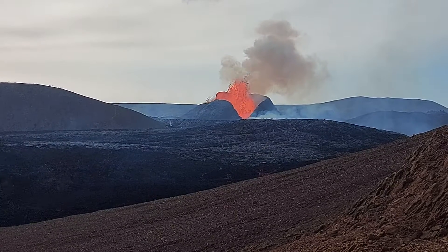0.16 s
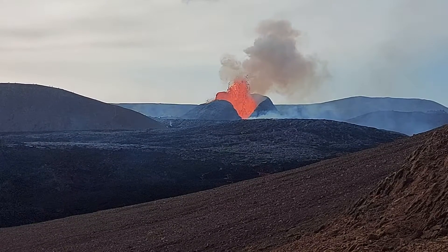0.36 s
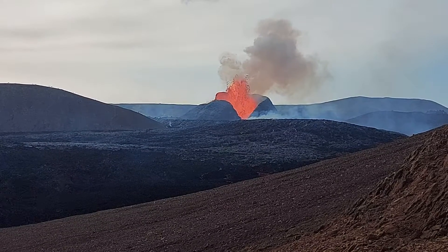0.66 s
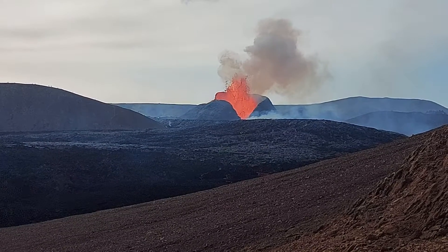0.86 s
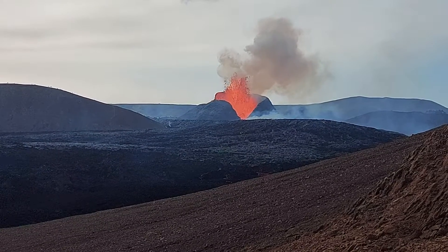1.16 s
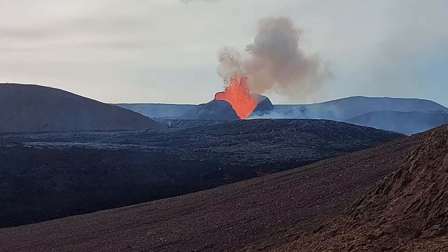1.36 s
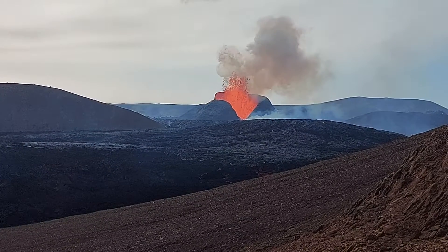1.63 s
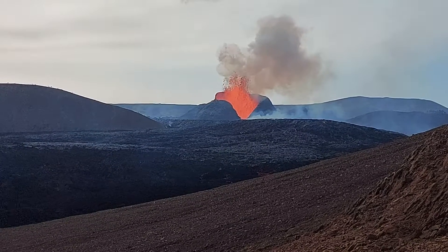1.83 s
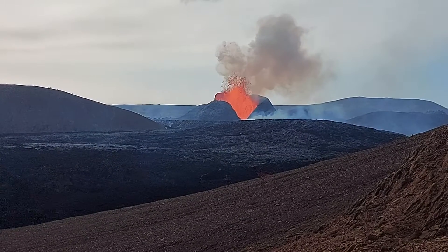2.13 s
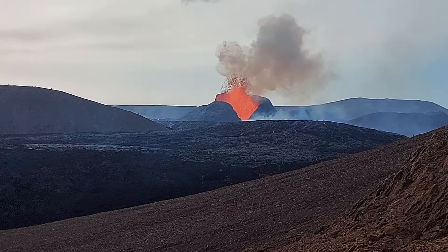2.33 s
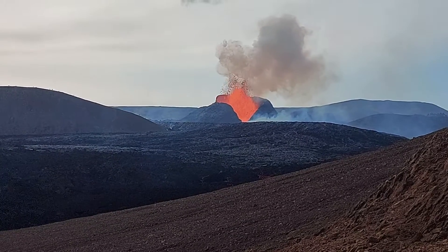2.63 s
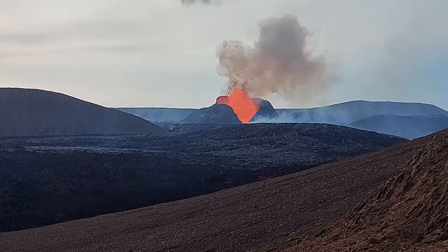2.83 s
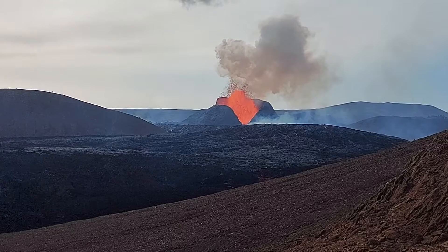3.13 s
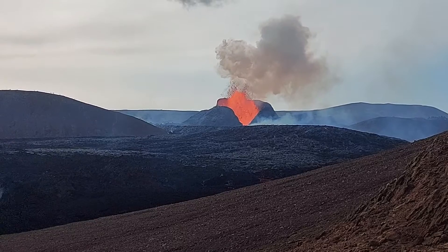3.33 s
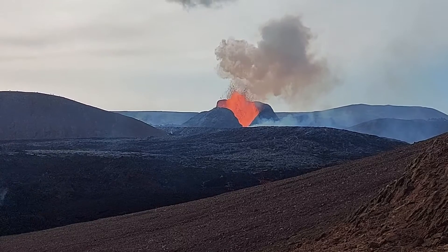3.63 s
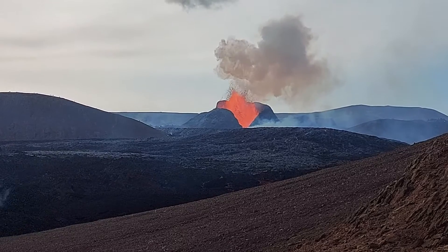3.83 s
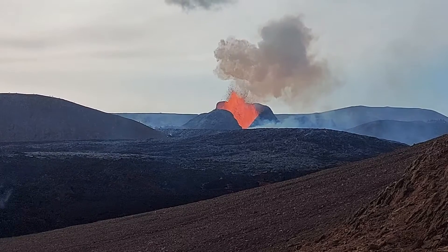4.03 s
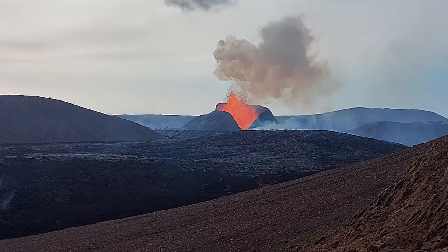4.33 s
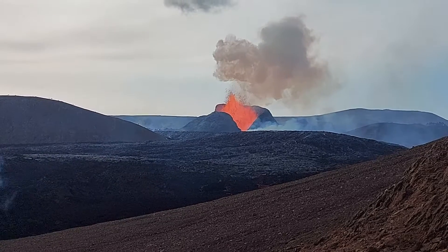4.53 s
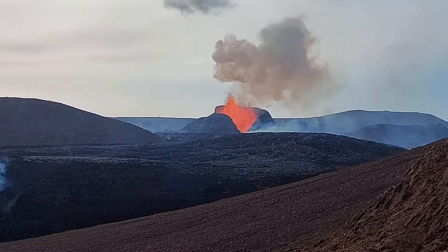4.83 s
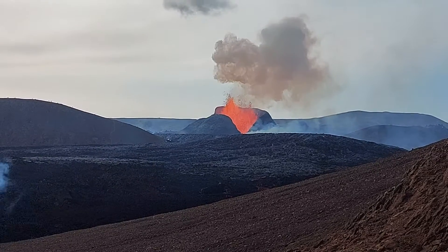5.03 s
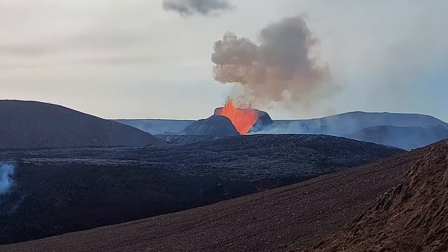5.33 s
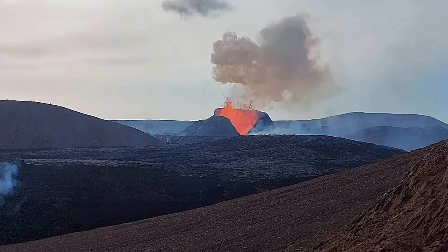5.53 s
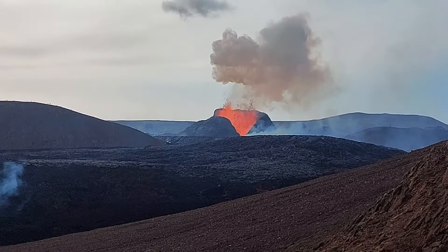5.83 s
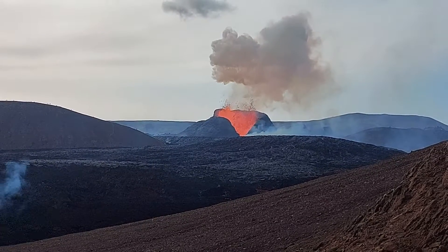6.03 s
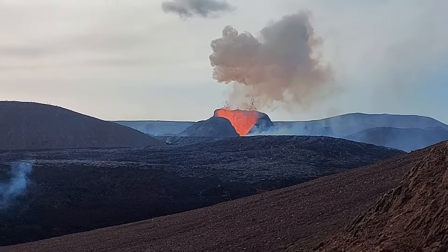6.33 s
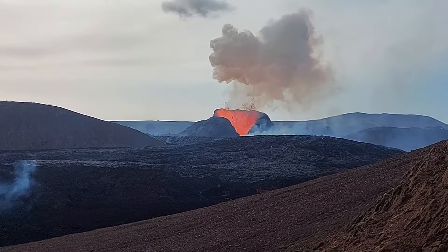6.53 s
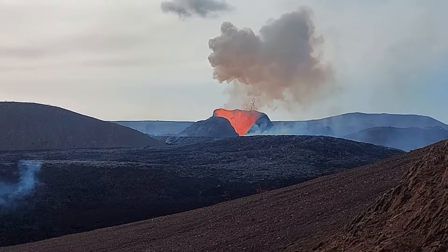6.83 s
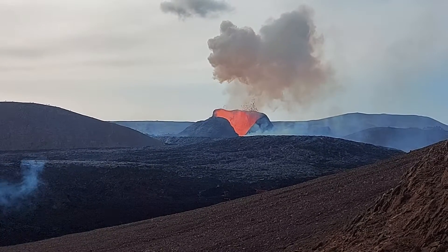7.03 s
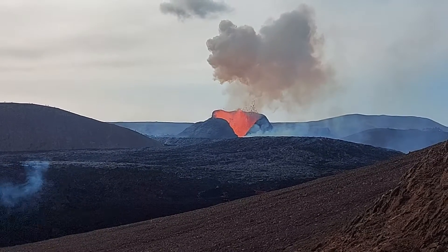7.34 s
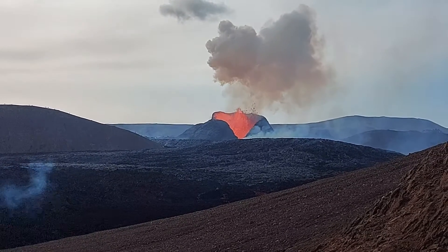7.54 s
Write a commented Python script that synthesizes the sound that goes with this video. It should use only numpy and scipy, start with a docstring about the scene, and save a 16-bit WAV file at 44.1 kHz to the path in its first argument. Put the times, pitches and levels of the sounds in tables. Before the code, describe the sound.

A distant lava fountain rumbles and rushes steadily, mostly bass and low mids, with a deep hollow resonance from the crater and irregular soft thumps. Wind presses on the microphone unevenly, strongest at first, making the left bass cut away. Faint close grit crunches just after four seconds, a sharp tick and small stone rattle come near six, then fine rustles near the end. Open terrain, faint hiss.

```python
"""On an open lava field, heard from a gravel slope, a lava fountain roars in a far spatter cone.
Turbulent gas and bursting slugs, as shaped noise and damped pulses, make the roar; the crater resonates deeply.
Wind eddies buffet and flutter at two microphone ports, and the bass drops away at times on the left.
Impulses and resonated grains give faint ticks, rustles, crunches and a small stone close by, over a thin hiss."""
import sys
import numpy as np
from scipy import signal
from scipy.fft import rfft, irfft
from scipy.io import wavfile
from scipy.ndimage import uniform_filter1d

SR = 44100
rng = np.random.default_rng(int(sys.argv[2]) if len(sys.argv) > 2 else 0)


def to_wav(sig):
    """Store sig (one row per channel, or 1-D mono) as 16-bit WAV at the path in sys.argv[1].

    Samples outside -1..1 are clipped; the rate is SR.
    """
    pcm = np.clip(np.atleast_2d(sig), -1, 1) * 32767
    pcm = np.round(pcm).astype(np.int16)
    wavfile.write(sys.argv[1], SR, pcm.T)  # frames by channels


N = 338688
TIME = np.arange(N) / SR


def undb(db):
    """Logarithmic level: decibels to an amplitude gain."""
    return 10 ** (np.asarray(db) / 20)


def curve(table):
    """Linear interpolation: a table of (seconds, value) read at every sample."""
    seconds, values = np.transpose(table)
    return np.interp(TIME, seconds, values)


def unit(x):
    """Normalisation: scale to an rms of 1."""
    return x / np.sqrt(np.mean(x ** 2))


def steady(x, span_s):
    """Envelope flattening: about rms 1 over every span, so that only quicker flutter stays."""
    size = int(span_s * SR / 2)
    power = uniform_filter1d(uniform_filter1d(x ** 2, size), size)
    return x / np.sqrt(power + 1e-18)


def colour(x, points):
    """Linear filtering: gains at (Hz, dB) points, joined along a logarithmic frequency axis."""
    point_hz, point_db = np.transpose(points)
    hz = np.maximum(np.fft.rfftfreq(N, 1 / SR), 1)
    gain_db = np.interp(np.log(hz), np.log(point_hz), point_db)
    return irfft(rfft(x) * undb(gain_db), N)


def ring(x, hz, width_hz):
    """Resonance: one damped mode, its decay set by its bandwidth."""
    b, a = signal.iirpeak(hz, hz / width_hz, fs=SR)
    return signal.lfilter(b, a, x)


def pan(left_over_right_db):
    """Level difference between the channels: left and right gains with a mean of 1."""
    left = undb(np.atleast_1d(left_over_right_db))
    return 2 * np.array([left, np.ones_like(left)]) / (1 + left)


def bell(peak_s, half_s):
    """Gaussian envelope: a smooth swell towards 1 and back, 1/e at half_s from the peak."""
    return np.exp(-((TIME - peak_s) / half_s) ** 2)


def held(start_s, end_s, edge_s):
    """Trapezoidal envelope: rises to 1 around the start, holds, and falls around the end."""
    return np.clip(np.minimum(TIME - start_s, end_s - TIME) / edge_s + .5, 0, 1)


def billow(per_s):
    """Smoothed random process: wandering with an rms of 1, slower for a smaller per_s."""
    size = int(SR / per_s)
    smooth = uniform_filter1d(rng.standard_normal(N), size, mode="wrap")
    return unit(uniform_filter1d(smooth, size, mode="wrap"))


def bursts(per_s, spread_db):
    """Random point process: pressure pulses, many small and a few large."""
    size = undb(spread_db * np.minimum(rng.exponential(size=N), 4))
    hits = size * (rng.random(N) < per_s / SR)
    return unit(hits - hits.mean())


def turbulence(per_s, spread_db, gas_db):
    """Broadband flow noise: bursting bubbles in a stream of rushing gas."""
    return bursts(per_s, spread_db) + undb(gas_db) * rng.standard_normal(N)


# Short rises and falls of the rumble and roar; the whole bass sinks in the falls. Each row: peak in seconds,
# half length in seconds, rise of the rumble in dB, rise of the roar in dB; a negative rise is a fall.
RISES_AND_FALLS = [(0.002, 0.025, 9.5, 4.5), (0.083, 0.036, -10, 0), (0.217, 0.072, 1, 2),
                   (.49, 0.025, -6.5, 1), (0.562, 0.042, 1, 4.5), (0.656, 0.018, -14, 0),
                   (1.02, 0.078, -1.5, 1), (1.403, 0.013, -6, -3), (1.512, 0.037, -12.5, -1),
                   (1.627, .03, -12, -3), (1.717, 0.017, -12, -3), (1.848, 0.021, -9, 1.5),
                   (2.09, 0.017, -11, 2), (2.18, .036, 0, 2), (2.58, 0.0069, 1, 2), (2.77, 0.032, -6, .5),
                   (3.194, 0.041, 2, 2), (3.285, 0.0097, -9.5, -4), (3.45, 0.027, -5.5, -0.5),
                   (3.79, 0.04, -3.5, -.5), (4.164, .012, -3, -1.5), (4.54, 0.017, -2, 0),
                   (5.194, 0.044, 4, 0), (5.301, 0.01, -11, 1.5), (5.35, 0.058, 0.5, 0),
                   (5.45, 0.014, -3.5, -2), (5.63, 0.01, -5.5, 0), (5.676, 0.0067, -5.5, 0.5),
                   (5.843, 0.056, 0, -1), (6.45, 0.066, -2.5, -.5), (6.613, 0.02, 3.5, 2),
                   (6.668, 0.013, -2.5, -3), (6.954, 0.054, 0.5, -0.5), (7.04, 0.032, -1, -2),
                   (7.24, 0.011, -6, -3), (7.329, 0.017, -10, .5), (7.521, 0.028, 0, -2.5),
                   (7.61, 0.016, 4, 0.5)]


def bass_falls():
    """Amplitude modulation: the falls of the rumble alone, in dB, for the rest of the bass to share."""
    return sum(min(rumble_rise_db, 0) * bell(s, half_s) for s, half_s, rumble_rise_db, _ in RISES_AND_FALLS)


# Strength of the fountain, which drives roar, rumble and crater note. Each row: time in seconds, level in dB.
FOUNTAIN_LEVEL = [(0, -46.5), (.95, -49), (1.3, -45.5), (1.6, -46.5), (1.9, -45), (2.6, -43.5), (3.4, -43),
                  (4.05, -39), (4.95, -43), (5.8, -42), (6.3, -39.5), (6.8, -41), (7.2, -39), (7.68, -40)]
# Long blows that set the crater ringing. Each row: start in seconds, end in seconds, rise of its note in dB.
CRATER_BLOWS = [(1.084, 1.353, 10.5), (2.15, 3.3, 3), (3.818, 4.38, 4), (4.665, 5.44, 7)]
BLOW_EDGE_S = 0.053
RUMBLE_OVER_FOUNTAIN_DB, CRATER_OVER_FOUNTAIN_DB = 6.5, -1.5


def levels():
    """Common source strength: rumble, roar and crater note, in dB, follow the fountain with rises and falls."""
    fountain_db = curve(FOUNTAIN_LEVEL)
    rumble_db = fountain_db + RUMBLE_OVER_FOUNTAIN_DB + 1.0 * billow(per_s=16)
    roar_db = fountain_db + 0.24 * billow(per_s=8.4) + 0.56 * billow(per_s=56)
    crater_db = fountain_db + CRATER_OVER_FOUNTAIN_DB + bass_falls()
    for start_s, end_s, rise_db in CRATER_BLOWS:
        crater_db = crater_db + rise_db * held(start_s, end_s, BLOW_EDGE_S)
    for s, half_s, rumble_rise_db, roar_rise_db in RISES_AND_FALLS:
        swell = bell(s, half_s)
        rumble_db = rumble_db + rumble_rise_db * swell
        roar_db = roar_db + roar_rise_db * swell
    return rumble_db, roar_db, crater_db


# Colour of the vent's low turbulence. Each row: frequency in Hz, gain in dB.
RUMBLE_COLOUR = [(15, -36), (25, -23), (46, -3.5), (62, -2.5), (75, -8.5), (92, -6), (128, -3), (175, -7),
                 (215, -7), (262, -5), (322, -7.5), (365, -26.5), (460, -46.5), (770, -120)]


def rumble(rumble_db):
    """Long-wavelength flow noise: the vent's low turbulence reaches both ports alike."""
    gas = colour(turbulence(per_s=220, spread_db=2.0, gas_db=1.0), RUMBLE_COLOUR)
    return steady(gas, span_s=0.14) * undb(rumble_db)


# Drifting note of the crater. Each row: time in seconds, pitch in Hz.
CRATER_NOTE = [(0, 73.87), (1.1, 72.5), (2.2, 79.88), (3, 76.9), (4, 75.1), (5, 75.14), (7.68, 76)]
CRATER_WIDTH_HZ = 2.7


def crater(crater_db):
    """Cavity resonance: the gas keeps the hollow of the cone ringing; its note drifts as the lava heaves."""
    hz = curve(CRATER_NOTE)
    mean_hz = hz.mean()
    note = ring(rng.standard_normal(N), mean_hz, CRATER_WIDTH_HZ)
    note = ring(note, mean_hz, 3 * CRATER_WIDTH_HZ)
    # reading the steady note faster or slower bends its pitch
    note = np.interp(np.cumsum(hz / mean_hz), np.arange(N), note)
    return steady(note, span_s=0.08) * undb(crater_db)


# Colour of the direct roar, with ripples from the ground echo. Each row: frequency in Hz, gain in dB.
DIRECT_COLOUR = [(210, -29.5), (345, -1.5), (368, -5.5), (420, 1), (490, -2.5), (624, -3), (780, -11),
                 (919, -15.5), (1110, -13), (1200, -17), (1360, -27), (1600, -24.5), (1740, -33),
                 (1930, -33.5), (2250, -50), (2600, -59.5), (3400, -88.5), (5700, -120)]
# Colour of the roar scattered from the hills. Each row: frequency in Hz, gain in dB.
SCATTERED_COLOUR = [(200, -27.5), (350, 7.5), (480, -14.5), (700, -5), (890, -7), (1080, -11.5),
                    (1350, -16.5), (1600, -20.5), (1950, -21.5), (2400, -40), (3400, -79.5), (6000, -120)]


def jet(roar_db):
    """Jet noise, direct and diffuse: one roar straight over the field, another scattered from the hills."""
    gas = colour(turbulence(per_s=600, spread_db=2.0, gas_db=1.5), DIRECT_COLOUR)
    direct = steady(gas, span_s=0.2)
    # unlike noise in the two channels spreads the sound
    scattered = unit(colour(rng.standard_normal((2, N)), SCATTERED_COLOUR))
    return undb(roar_db) * (undb(0.48) * direct + undb(-10.0) * scattered)


# Gusts of wind on the ports. Each row: start in seconds, end in seconds, level in dB.
WIND_GUSTS = [(-.1, 1.85, -36.5), (1.798, 3, -48), (3.28, 3.68, -38.5), (3.85, 4.03, -38),
              (5.28, 5.88, -40), (6.3, 8.1, -39)]
BREEZE_DB, GUST_EDGE_S = -50, 0.12


def wind():
    """Addition of powers: the wind level in dB is that of gusts over a light breeze."""
    power = undb(BREEZE_DB) ** 2
    for start_s, end_s, db in WIND_GUSTS:
        power = power + (undb(db) * held(start_s, end_s, GUST_EDGE_S)) ** 2
    return 10 * np.log10(power)


# Colour of the large eddies. Each row: frequency in Hz, gain in dB.
BUFFETING_COLOUR = [(15, -41), (25, -15.5), (55, 4), (90, 3.5), (145, 1), (200, -5.5), (300, -11),
                    (420, -22), (800, -39), (1800, -110)]
FALL_SHARE = 0.51  # part of each bass fall, in dB, by which the buffeting sinks too


def buffeting(wind_db):
    """Turbulent pressure on a port: each has its own eddies, so the two are uncorrelated."""
    eddies = steady(colour(rng.standard_normal((2, N)), BUFFETING_COLOUR), span_s=0.15)
    return eddies * undb(wind_db + FALL_SHARE * bass_falls())


# Colour of the smaller eddies. Each row: frequency in Hz, gain in dB.
FLUTTER_COLOUR = [(120, -35), (250, -11.5), (340, 0), (420, -6.5), (600, -10.5), (900, -21.5), (1400, -33),
                  (2500, -74.5), (5000, -120)]


def flutter(wind_db):
    """Small-scale turbulence: eddies flutter above the bass as the wind rises, most on the windward left."""
    eddies = unit(colour(rng.standard_normal((2, N)), FLUTTER_COLOUR))
    return eddies * undb(wind_db - 13.5) * pan(12)


# Colour of the microphones' hiss. Each row: frequency in Hz, gain in dB.
HISS_COLOUR = [(1500, -3), (4300, -5), (7300, -8.5), (9500, -5), (11400, 0.5), (14200, -2.5), (15500, -6)]


def hiss():
    """Self-noise: the microphones' own steady hiss, brighter on the left."""
    left, right = unit(colour(rng.standard_normal((2, N)), HISS_COLOUR)) * undb(-77.5)
    return np.array([colour(left, [(6000, -1.0), (9000, 2.5)]), right])


# Response of the left port, duller near the top of the roar. Each row: frequency in Hz, gain in dB.
LEFT_PORT_RESPONSE = [(280, 0), (780, -0.5), (920, -1), (1100, -0.5), (1650, -1.5), (2000, -8.5),
                      (2500, -2.5)]
# Times when the left bass drops away. Each row: start in seconds, end in seconds, level change in dB.
LEFT_BASS_DIPS = [(0.05, 0.11, -7), (0.212, 0.318, -27), (0.44, 1.748, -26.5), (3.227, 3.43, -13),
                  (3.526, 3.807, -9), (5.822, 5.87, -32), (7.003, 7.11, -14), (7.223, 7.344, -10.5),
                  (7.505, 7.63, -14)]
DIP_EDGE_S, DIP_BELOW_HZ = 0.063, 270


def left_port(left):
    """Port response and time-varying filtering: a duller port, where all below a steep edge sinks at times."""
    left = colour(left, LEFT_PORT_RESPONSE)
    hz = np.fft.rfftfreq(N, 1 / SR)
    low = irfft(rfft(left) / (1 + (hz / DIP_BELOW_HZ) ** 20), N)
    dip_db = sum(db * held(start_s, end_s, DIP_EDGE_S) for start_s, end_s, db in LEFT_BASS_DIPS)
    return left - low + low * undb(dip_db)


# Bursting gas slugs, large ones as low thuds, small ones as short pops.
# Each row: start in seconds, peak of the envelope in dB before the air dulls it, pitch in Hz.
GAS_SLUGS = [(0.145, -32, 76), (0.196, -32.5, 179), (0.323, -33, 255), (0.379, -33.5, 262),
             (0.568, -32, 464), (0.605, -32.5, 360), (0.813, -34.5, 510), (0.935, -32, 354),
             (1.216, -35, 520), (1.283, -34.5, 436), (1.33, -34, 500), (1.435, -33.5, 445),
             (1.791, -33.5, 273), (1.903, -30.5, 246), (2.006, -30.5, 176), (2.127, -29, 72),
             (2.19, -32.5, 196), (2.275, -32.5, 223), (2.418, -32.5, 273), (2.489, -35, 629),
             (2.522, -32, 61.4), (3.026, -33, 303), (3.064, -37, 76), (3.186, -35.5, 262),
             (3.187, -32.0, 590), (3.61, -33, 479), (3.622, -28, 240), (3.692, -33.5, 520),
             (3.715, -30.5, 260), (3.756, -34.5, 620), (3.845, -31.5, 76), (3.879, -34, 442),
             (3.945, -22.5, 261), (4.005, -32, 66.8), (4.028, -32.5, 247), (4.089, -32, 597),
             (4.436, -30, 80), (4.999, -28, 76.3), (5.265, -28.0, 270), (5.297, -35, 410),
             (5.321, -23.5, 71.8), (5.505, -34, 525), (5.53, -26, 259), (5.77, -29.5, 84),
             (5.923, -34, 515), (6.066, -34, 465), (6.185, -32, 430), (6.373, -25.5, 266),
             (6.439, -35, 544), (6.593, -32, 457), (6.704, -28.5, 196), (6.73, -32, 72.4),
             (6.779, -32.0, 199), (6.842, -31.5, 76.3), (6.999, -33, 604), (7.166, -23, 293),
             (7.254, -26.5, 289), (7.289, -28.5, 434), (7.359, -29.5, 72), (7.646, -24.5, 66)]
# Loss of treble in the air on the way. Each row: frequency in Hz, gain in dB.
AIR_LOSS = [(800, -0.5), (1400, -4), (2400, -36)]
SLUG_CYCLES = 2.85  # sets the envelope length: its peak comes after half this many cycles


def slugs():
    """Damped oscillation: a slug pushes and swings back in a few cycles, large ones longer; distance dulls it."""
    out = np.zeros(N)
    for s, db, hz in GAS_SLUGS:
        start = int(s * SR)
        age = TIME[:min(N - start, SR // 4)]
        swell = 2 * age * hz / SLUG_CYCLES
        envelope = swell * np.exp(1 - swell)
        out[start:start + len(age)] += undb(db) * envelope * np.sin(2 * np.pi * hz * age)
    return colour(out, AIR_LOSS)


# Faint ticks close by. Each row: time in seconds, peak in dB as the mean of the two channels,
# pitch in Hz, gain of the bright edge in dB, left over right in dB.
NEAR_TICKS = [(.286, -46.5, 6100, -5, -25), (.304, -55.5, 6200, -7, -17), (1.613, -57, 6400, -12, -17),
              (1.79, -59, 5400, -2, -13), (3.696, -60, 5200, -5, -14), (5.028, -60, 4600, -11, -12),
              (5.814, -39.5, 4900, 7.5, -33), (5.931, -53.5, 5630, -11, -19), (6.502, -60, 4200, -10, -9),
              (6.622, -60, 6400, -4, -5)]
# Body of a tick. Each row: frequency as a multiple of its pitch, gain in dB.
TICK_BODY = [(.3, -17.5), (.6, -12), (0.759, 1.5), (.98, 2.5), (1.25, -0.5), (1.55, -14.5), (2.6, -27.5)]
# Bright edge of a tick. Each row: frequency in Hz, gain in dB.
TICK_EDGE = [(6000, -38), (9200, -8.5), (11500, -0.5), (15500, -4.5)]
TICK_FIZZ_DB, TICK_FIZZ_S = -32.5, .025


def ticks():
    """Impulse response: dry contacts to the right, one sharp snap, then a faint fizz of settling grit."""
    out = np.zeros((2, N))
    for s, db, hz, edge_db, pan_db in NEAR_TICKS:
        age = TIME - s
        fizz = rng.standard_normal(N) * (age > 0) * np.exp(-np.abs(age) / TICK_FIZZ_S)
        hit = undb(TICK_FIZZ_DB) * fizz
        hit[int(s * SR)] += 1
        body = colour(hit, [(multiple * hz, body_db) for multiple, body_db in TICK_BODY])
        tick = body + undb(edge_db) * colour(hit, TICK_EDGE)
        out += undb(db) * tick / np.abs(tick).max() * pan(pan_db)
    return out


# Soft gritty rustles close by. Each row: peak time in seconds, level in dB before the two grains are mixed,
# half length in seconds, brightness from 0 to 1.
NEAR_RUSTLES = [(2.444, -79, .025, 0.95), (2.498, -82, 0.36, 0.87), (4.17, -82, 0.26, 0.3),
                (4.52, -84, .11, 0.16), (5.228, -82.5, .03, .13), (5.69, -84, .02, .1),
                (6.9, -76.5, 0.031, 1), (6.997, -78, 0.098, 0.86), (7.315, -77, .04, 1),
                (7.41, -75.5, .035, 0.8), (7.584, -76, 0.17, 0.87)]
# Colour of the fine grains. Each row: frequency in Hz, gain in dB.
FINE_COLOUR = [(2500, -24.5), (6000, -10.5), (9000, -5.5), (12000, 1), (15500, -10)]
# Colour of the coarse grains. Each row: frequency in Hz, gain in dB.
COARSE_COLOUR = [(1500, -31.5), (2350, 3), (2800, 2.5), (3200, -8.5), (4300, -11.5), (5300, -24.5),
                 (9000, -39)]


def rustles():
    """Granular noise: grains swell and fade, fine bright ones on the left, coarse dull ones just right of centre."""
    fine = np.array([unit(colour(bursts(per_s=1100, spread_db=3.0), FINE_COLOUR)) for _ in range(2)])
    coarse = np.array([unit(colour(bursts(per_s=100, spread_db=0.5), COARSE_COLOUR)) for _ in range(2)])
    fine, coarse = fine * pan(10), coarse * pan(-0.5)
    out = np.zeros((2, N))
    for s, db, half_s, bright in NEAR_RUSTLES:
        out += undb(db) * bell(s, half_s) * (bright * fine + (1 - bright) * coarse)
    return out


# Short crunches close by. Each row: start in seconds, level in dB before the envelope, centre in Hz,
# decay time in seconds, gain of the upper resonances in dB.
NEAR_CRUNCHES = [(4.044, -71, 2730, .011, 6), (4.328, -77, 2750, .012, 5), (4.385, -80, 2910, .015, 3),
                 (4.443, -69, 2720, .018, -2), (4.557, -81, 2750, .014, 3), (4.592, -73, 2800, .009, -3),
                 (4.632, -79.5, 2680, .01, -4)]
# Resonances of the grit. Each row: frequency as a multiple of the centre, width in Hz of the first
# of two filters, level in dB.
GRIT_MODES = [(1, 420, 4), (1.18, 420, -3.5), (1.4, 550, -8)]


def crunches():
    """Resonant grains: a cluster of gritty contacts rings briefly and dies away, to the right."""
    grains = bursts(per_s=1200, spread_db=1.0)
    out = np.zeros(N)
    for s, db, hz, decay_s, upper_db in NEAR_CRUNCHES:
        modes = []
        for multiple, width_hz, mode_db in GRIT_MODES:
            mode = ring(ring(grains, multiple * hz, width_hz), multiple * hz, 1.4 * width_hz)
            modes.append(undb(mode_db) * steady(mode, span_s=.02))
        band = unit(modes[0] + undb(upper_db) * sum(modes[1:]))
        age = TIME - s
        envelope = np.clip(age / .002, 0, 1) * np.exp(-np.abs(age) / decay_s)
        out += undb(db) * band * envelope
    return out * pan(-7.5)


# Modes of a small stone. Each row: frequency in Hz, width in Hz of the first of two filters, level in dB.
STONE_MODES = [(2700, 250, -2), (3280, 100, -1), (3775, 80, 1), (4320, 220, -6), (5500, 200, -11)]
KNOCK_S, KNOCK_DB, KNOCK_DECAY_S = 5.863, -72.5, .014  # start, level before the envelope, decay time


def knock():
    """Modal vibration: a small stone rattles briefly to the right as a run of tiny contacts rings its modes."""
    contacts = bursts(per_s=990, spread_db=0.0)
    modes = np.zeros(N)
    for hz, width_hz, db in STONE_MODES:
        mode = ring(ring(contacts, hz, width_hz), hz, 2 * width_hz)
        modes += undb(db) * steady(mode, span_s=.02)
    age = TIME - KNOCK_S
    envelope = np.clip(age / .003, 0, 1) * np.exp(-np.abs(age) / KNOCK_DECAY_S)
    return undb(KNOCK_DB) * unit(modes) * envelope * pan(-10)


def scene():
    """Superposition: the far vent, the wind and the small sounds nearby add as pressures."""
    rumble_db, roar_db, crater_db = levels()
    wind_db = wind()
    fountain = rumble(rumble_db) + crater(crater_db) + jet(roar_db) + slugs()
    left, right = fountain + buffeting(wind_db) + flutter(wind_db)
    far = np.array([left_port(left), right])
    return far + hiss() + ticks() + rustles() + crunches() + knock()


TOP_HZ = 15700


def record(dry):
    """Band limiting: a 3 ms fade-in, then a steep low-pass removes the highest treble."""
    opening = np.minimum(TIME / .003, 1)
    # order 8, 0.2 dB ripple, 70 dB rejection
    low_pass = signal.ellip(8, .2, 70, TOP_HZ, fs=SR, output="sos")
    return signal.sosfilt(low_pass, dry * opening)


dry = scene()
out = record(dry)
to_wav(out)
```